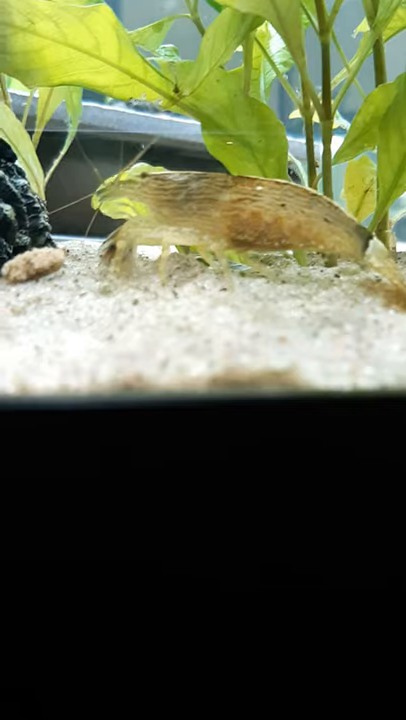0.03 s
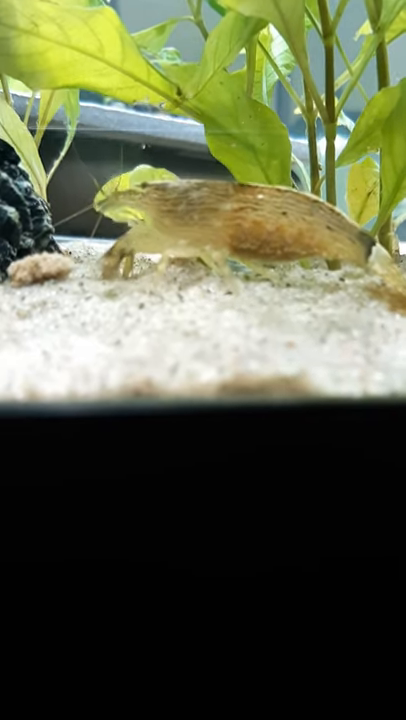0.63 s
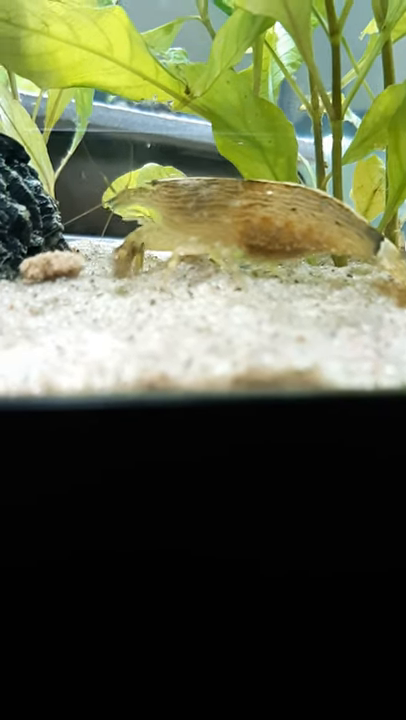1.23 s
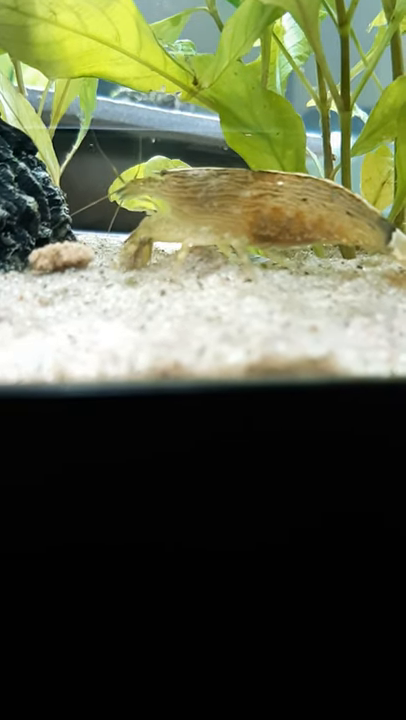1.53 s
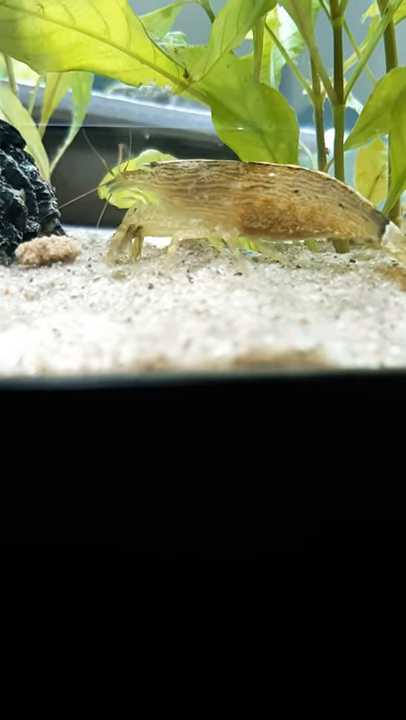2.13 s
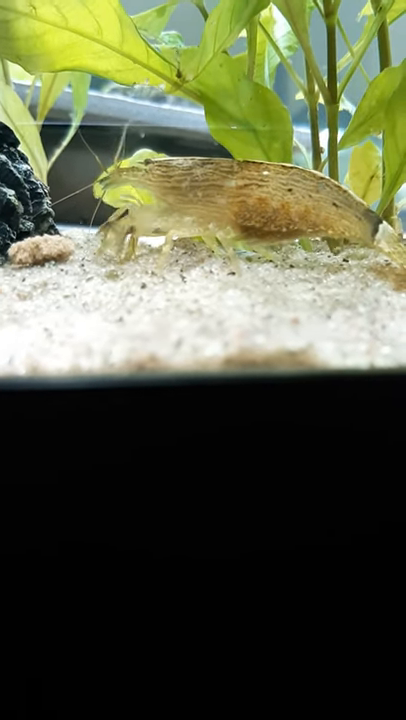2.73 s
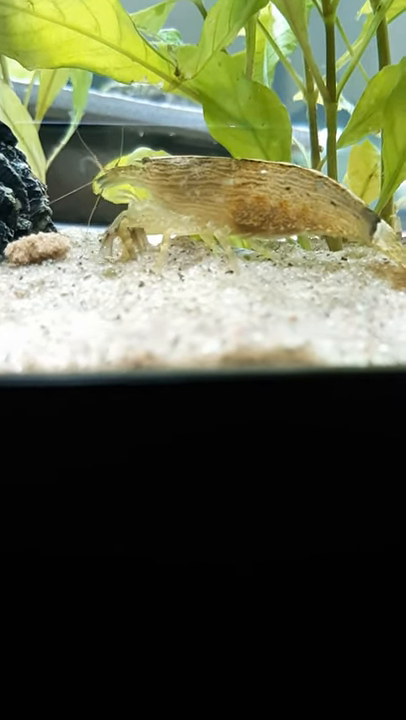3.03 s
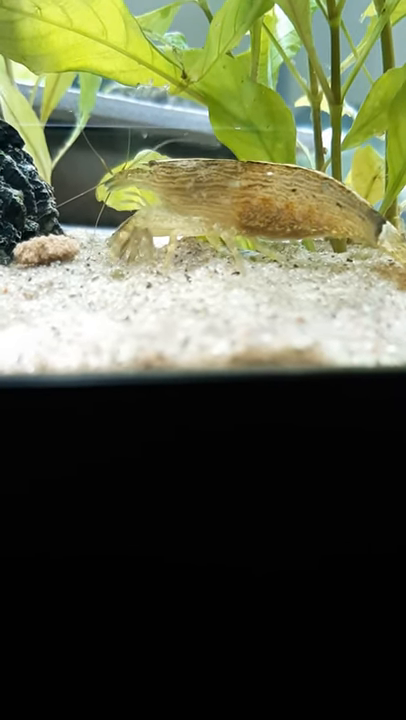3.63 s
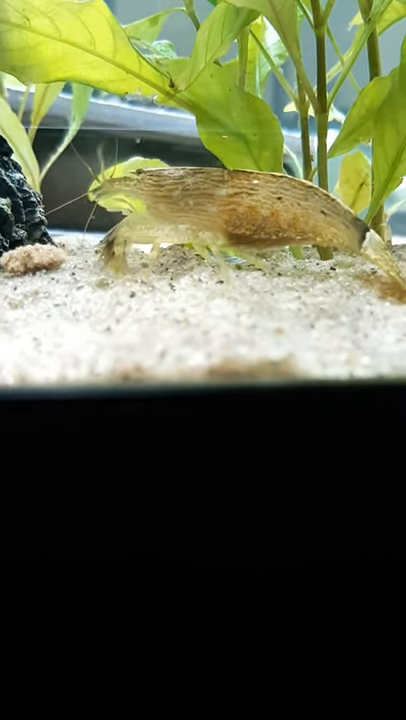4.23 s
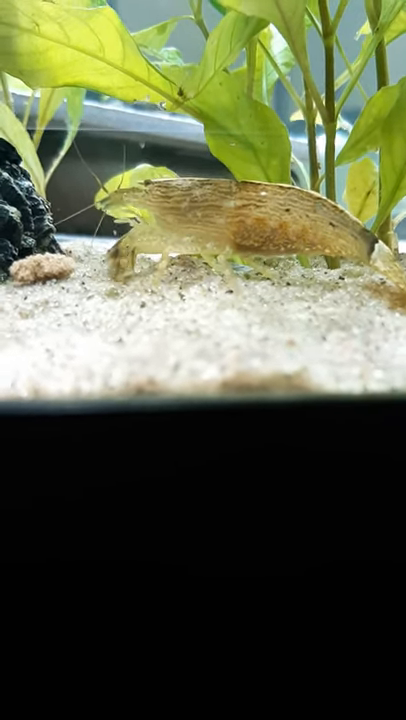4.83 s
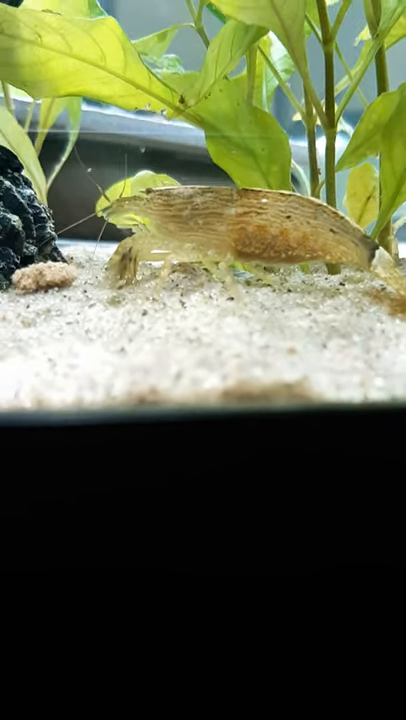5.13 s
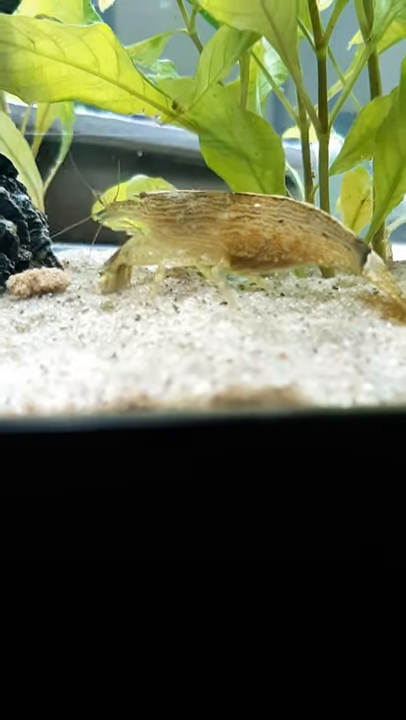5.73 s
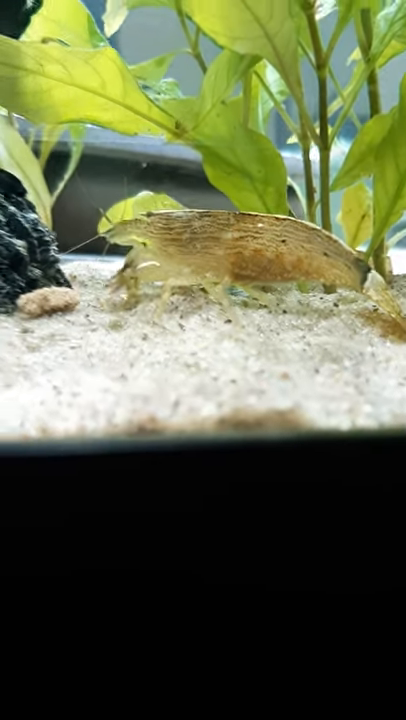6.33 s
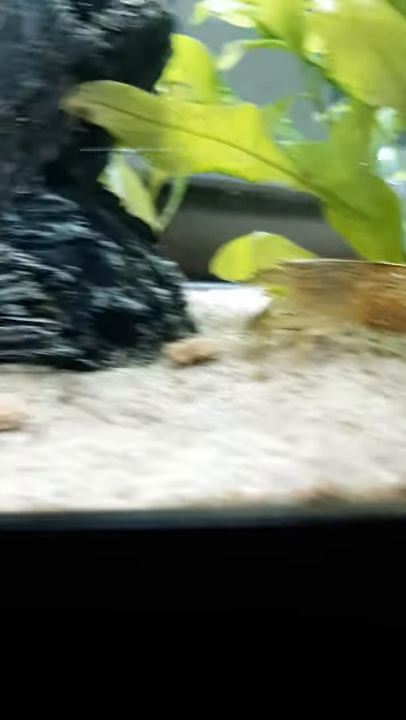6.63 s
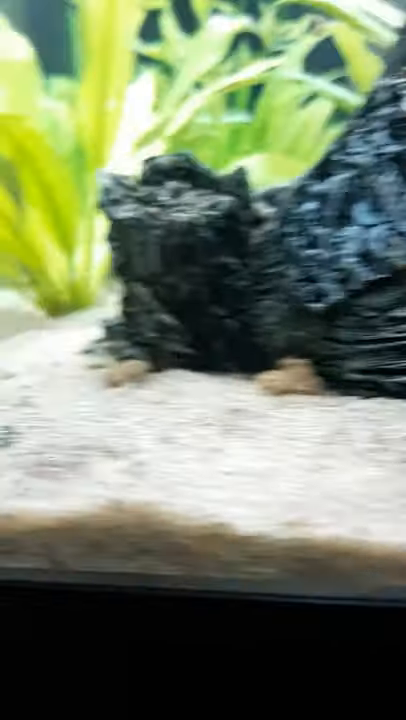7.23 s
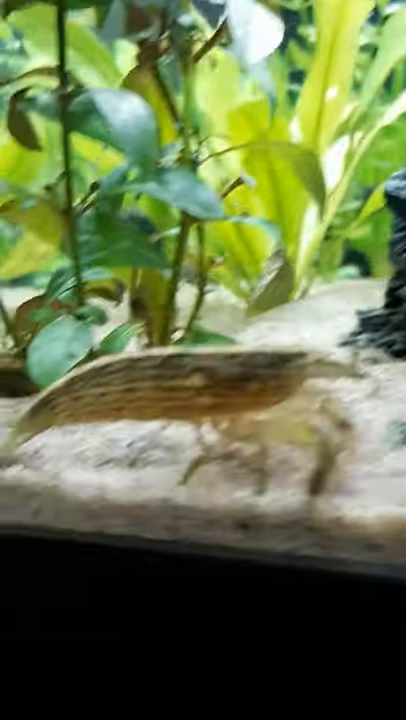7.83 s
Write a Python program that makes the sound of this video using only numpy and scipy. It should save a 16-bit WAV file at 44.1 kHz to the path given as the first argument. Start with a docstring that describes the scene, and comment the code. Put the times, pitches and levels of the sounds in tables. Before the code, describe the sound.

Scattered sharp clicks and pops strike the left or right side of a hand-held stereo microphone, some light, a few loud. Far beneath them are the steady low hum of an aquarium pump, faint bubbling water with small plinks, and a few soft handling thuds. Toward the end the pops stop and the hum and low room noise rise a little.

```python
"""A quiet room, close beside an aquarium, on the stereo microphones of a hand-held phone.
The pump hums on mains harmonics, water trickles and bubbles faintly, and the hand bumps the case.
Sharp dry pops stand far above all this: each is a sudden jump in the signal of one microphone,
so it sounds in one ear only, and the loudest make the gain duck. Near the end the phone moves
along the tank, and the hum and the low room noise grow."""
import sys
import numpy as np
from scipy import signal
from scipy.fft import rfft, irfft
from scipy.io import wavfile
from scipy.ndimage import minimum_filter1d

SR = 44100
rng = np.random.default_rng(int(sys.argv[2]) if len(sys.argv) > 2 else 0)


def master_out(mix):
    """Clip the mix to full scale and print it as 16-bit PCM to the path in sys.argv[1]."""
    frames = np.transpose(np.atleast_2d(mix))
    ceiling = np.clip(frames, -1, 1)
    pcm = np.round(ceiling * 32767).astype(np.int16)
    wavfile.write(sys.argv[1], SR, pcm)


N = 347949
T = np.arange(N) / SR
FREQS = np.fft.rfftfreq(N, 1 / SR)

# All source levels are at the microphones, ahead of the phone's gain control.
# pump harmonics: (multiple of the magnetic pull [1], relative level [dB])
PUMP_HARMONICS = [(1, -15.5), (2, 1), (3, -13.5), (4, -26), (5, -15), (6, -25)]
# low room noise: (frequency [Hz], relative density [dB])
ROOM_SPECTRUM = [(20, -23.5), (35, -17), (65, -4), (105, -5.5), (150, 0.5), (180, -5), (240, 0), (280, -7),
                 (350, -9.5), (440, -11), (540, -8.5), (700, -12.5), (1000, -19), (2000, -36)]
# hiss: (frequency [Hz], relative density [dB])
HISS_SPECTRUM = [(200, 6.5), (900, 6), (1500, 7.5), (2100, 3.5), (2400, 5.5), (3500, 4.5), (4400, 2),
                 (5500, 1.6), (6700, -1.8), (7400, -4), (10000, -2.8), (13000, -1), (15700, -1.5),
                 (16100, -30.5)]
# resonances that moving water excites: (centre [Hz], width [Hz], level [dB])
WATER_RESONANCES = [(1110, 220, -79.5), (1552, 70, -78.5), (1820, 240, -78.5), (2064, 220, -77),
                    (3420, 696, -82), (6570, 750, -80)]
# plinks and fizzes of water: (time [s], rise [s], centre [Hz], level [dB], left minus right [dB])
WATER_GURGLES = [(.0, .33, 1018, -65, -1), (.85, .07, 2450, -64, -4), (.88, .08, 5700, -73, -4),
                 (1.415, .06, 1065, -56.5, -4), (2.5, .06, 3420, -64.5, -5), (2.51, .05, 1060, -69, -9),
                 (2.82, .07, 606, -66.5, 11), (3.26, .075, 6000, -63.5, -1), (3.31, .12, 1890, -70.5, -8),
                 (3.79, .08, 6470, -70, 1), (3.91, .12, 2010, -64.5, -6), (4.11, .055, 2240, -67.5, -8),
                 (5.27, .07, 1820, -68, -1), (5.3, .05, 1020, -66, -2), (6.17, .05, 1960, -66.5, 9),
                 (6.35, .11, 2010, -65, -2.5), (6.58, .06, 620, -67.5, 6)]
# signal jumps, before colouring: (time [s], level [dB], second jump's lag [ms], second re first [dB])
POP_JUMPS = [(0.5777, -7, 0.2307, -1.08), (0.5795, -19, .05, -14), (1.0847, -28.5, 0.13, -8),
             (1.6191, -15, 0.1237, -0.98), (1.6891, -23, 0.134, -11), (2.70049, -25.5, 0.14, -10.5),
             (2.72939, -18, .84, 2.5), (5.001, -7.5, 0.0984, -2.5), (5.0458, -4.5, 1.181, -1.5),
             (5.27975, -15.5, 0.1538, -2.5), (5.5789, -16.5, 0.058, -4.5), (6.0479, -24, 0.148, -13.5),
             (6.3088, -13, 0.064, -33)]
# microphone that each pop strikes: (side [0 left, 1 right])
POP_MICROPHONE = [1, 1, 0, 1, 0, 0, 0, 0, 0, 0, 1, 0, 0]
# colour of a pop: (frequency [Hz], gain [dB])
POP_SPECTRUM = [(50, 5.5), (120, 3), (230, 5), (420, 2.5), (1000, 1), (3500, 1.5), (5000, -2.5), (6200, -7),
                (7500, -18.5), (9400, -6), (12000, -2.5), (14700, -2), (16500, -3)]
# dull low thuds of the hand on the case, all swelling equally fast: (time [s], centre [Hz], level [dB])
HAND_BUMPS = [(1.51, 80, -49.5), (1.69, 63, -52), (3.21, 54.1, -65), (3.93, 58.8, -64), (4.67, 52, -59),
              (6.5, 54, -62.5), (7.12, 41.5, -66.5), (7.66, 40, -68.5)]
# noise suppressor: (lower band edge [Hz], depth [dB], level that opens the band [dB])
SUPPRESSOR_BANDS = [(404, -9.5, -43.5), (5060, -6.5, -20)]


def undb(db):
    """Decibels to gain."""
    return 10 ** (np.asarray(db) / 20)


def unit(x):
    """Scale to rms 1."""
    return x / np.sqrt(np.mean(x ** 2))


def colour(points):
    """Gain at every frequency from (frequency [Hz], gain [dB]) points."""
    hz, db = np.transpose(points)
    return undb(np.interp(np.log(FREQS + 1), np.log(hz), db))


def band(hz, width_hz):
    """Gain of a bell-shaped band, width_hz wide at half power."""
    return np.exp(-2 * np.log(2) * ((FREQS - hz) / width_hz) ** 2)


def noise(gain, likeness=0):
    """Stereo noise of rms 1 with the given spectrum and left-right correlation."""
    mid, side = rfft(rng.standard_normal((2, N))) * gain
    mid, side = mid * np.sqrt(1 + likeness), side * np.sqrt(1 - likeness)
    return unit(irfft([mid + side, mid - side], N))


def wander(rate_hz):
    """Smooth random wander of rms 1."""
    return unit(irfft(rfft(rng.standard_normal(N)) * np.exp(-(FREQS / rate_hz) ** 2), N))


def pan(db):
    """Microphone gains for a level difference, left minus right."""
    return undb(np.array([[db], [-db]]) / 2)


def swell(start_s, rise_s, hz, width_share, likeness=0):
    """A ring blurred into noise: it builds softly to a brief peak and dies away more slowly."""
    age = np.maximum(T - start_s, 0) / rise_s
    envelope = (age * np.exp(1 - age)) ** 2
    return noise(band(hz, width_share * hz), likeness) * envelope


def pump(level_db, pull_hz=100.0, drift_rad=0.1):
    """The pump's magnetic pull hums; weak harmonics waver as the phone moves through standing waves."""
    hum = 0
    for k, db in PUMP_HARMONICS:
        phase = 2 * np.pi * (k * pull_hz * T + rng.random()) + drift_rad * k * wander(3.6)
        waver_db = (-0.03 if k == 2 else 2.0) * wander(2.8)
        hum = hum + np.sqrt(2) * undb(db + waver_db) * np.sin(phase)
    return hum * undb(level_db) * pan(4.5)


def room_tone(low_db, hiss_db=-66, alike_below_hz=750):
    """Low room noise, its bass alike at both microphones, under an even hiss."""
    likeness = 0.8 * np.exp(-(FREQS / alike_below_hz) ** 2)
    low = noise(colour(ROOM_SPECTRUM), likeness) * pan(1.5)
    hiss = noise(colour(HISS_SPECTRUM))
    return low * undb(low_db) + hiss * undb(hiss_db)


def trickle(swell_db=3.0, swell_hz=5.0):
    """Moving water, faint and a little to the right: each resonance swells and fades on its own."""
    return pan(-2.0) * sum(noise(band(hz, width_hz)) * undb(db + swell_db * wander(swell_hz))
                           for hz, width_hz, db in WATER_RESONANCES)


def bubbles(count=80, softest_db=-76.5, range_db=1.0, centre_hz=1790, span_octaves=0.5, rise_s=0.033):
    """Tiny bubbles at random moments: each rings at its own pitch, in unrelated phase left and right."""
    t = T[:SR // 2]
    envelope = t / rise_s * np.exp(1 - t / rise_s)
    rings = np.zeros((2, N + len(t)))
    for when, pitch, strength, *phases in rng.random((count, 5)):
        hz = centre_hz * 2 ** (span_octaves * (pitch - 0.5))
        tone = np.sin(2 * np.pi * (hz * t + np.array(phases)[:, None]))
        start = int(when * N)
        rings[:, start:start + len(t)] += tone * envelope * undb(softest_db + range_db * strength)
    return rings[:, :N]


def gurgles(width_share=0.12):
    """Plinks and fizzes around the tank; the higher the ring, the wider its band."""
    return sum(undb(db) * pan(pan_db) * swell(start_s, rise_s, hz, width_share)
               for start_s, rise_s, hz, db, pan_db in WATER_GURGLES)


def microphone_pops(highpass_hz=101):
    """Two quick jumps in one microphone's signal; the input high-pass swings them back as a thump."""
    impulse_spectra = np.zeros((2, len(FREQS)), complex)
    for (start_s, db, lag_ms, second_db), side in zip(POP_JUMPS, POP_MICROPHONE):
        first = undb(db) * np.exp(-2j * np.pi * FREQS * start_s)
        second = first * undb(second_db) * np.exp(-2j * np.pi * FREQS * lag_ms / 1000)
        impulse_spectra[side] += first + second
    impulses = irfft(impulse_spectra * colour(POP_SPECTRUM), N)
    steps = np.cumsum(impulses, axis=1)
    highpass = signal.butter(3, highpass_hz, "high", fs=SR, output="sos")
    return signal.sosfilt(highpass, steps)


def hand_bumps(rise_s=0.075, width_share=0.45):
    """The hand shifts on the case, right by the microphones: dull thuds, alike in both."""
    return sum(undb(db) * swell(start_s, rise_s, hz, width_share, likeness=0.985)
               for start_s, hz, db in HAND_BUMPS)


def gain_control(x, threshold_db=-8, depth_db=-3, hold_s=0.82, glide_s=0.46):
    """The gain starts turned down; each loud peak holds it down a while, and it glides both ways."""
    loud = np.abs(x).max(axis=0) > undb(threshold_db)
    last_loud_s = np.maximum.accumulate(np.where(loud, T, 0))
    free = T - last_loud_s > hold_s
    step = 1 / (glide_s * SR)
    recovered = signal.lfilter([step], [1, step - 1], free)
    return x * undb(depth_db * (1 - recovered))


def noise_suppressor(x, hold_s=0.061, release_s=0.019, ahead_samples=100, edge_db=-46):
    """Each band of each channel stays turned down until a loud sound opens it, so hiss trails a pop."""
    highpasses = [1 - 1 / (1 + (FREQS / hz) ** 4) for hz, _, _ in SUPPRESSOR_BANDS]
    above = [irfft(rfft(x) * highpass, N) for highpass in highpasses] + [0]
    for k, (_, depth_db, threshold_db) in enumerate(SUPPRESSOR_BANDS):
        part = above[k] - above[k + 1]
        # it looks a moment ahead, so the edge of a pop passes whole
        loud = np.roll(np.abs(part) > undb(threshold_db), -ahead_samples, axis=1)
        last_loud_s = np.maximum.accumulate(np.where(loud, T, -1), axis=1)
        held_open = np.exp(-np.maximum(T - last_loud_s - hold_s, 0) / release_s)
        # weaker edges slip through without holding the band open
        nearby_peak = -minimum_filter1d(-np.abs(part), size=2 * ahead_samples, axis=1)
        openness = np.maximum(held_open, nearby_peak > undb(edge_db))
        x = x + part * (undb(depth_db * (1 - openness)) - 1)
    return x


def scene(move_s=5.89, hum_db_per_s=1.7, room_db_per_s=2):
    """Beside the tank; from move_s the phone moves along it, and the hum and low room noise grow."""
    moving_s = np.maximum(T - move_s, 0)
    hum = pump(level_db=-59.5 + hum_db_per_s * moving_s)
    room = room_tone(low_db=-64 + room_db_per_s * moving_s)
    water = trickle() + bubbles() + gurgles()
    return hum + room + water + microphone_pops() + hand_bumps()


def record(dry, open_s=0.066, fade_s=0.002, top_hz=16700):
    """The phone opens its input after a moment, rides the gain, holds the hiss down and cuts the top."""
    fade_in = np.clip((T - open_s) / fade_s, 0, 1)
    lowpass = 1 / np.sqrt(1 + (FREQS / top_hz) ** 200)
    controlled = noise_suppressor(gain_control(dry))
    return irfft(rfft(controlled * fade_in) * lowpass, N)


dry = scene()
out = record(dry)
master_out(out)
```